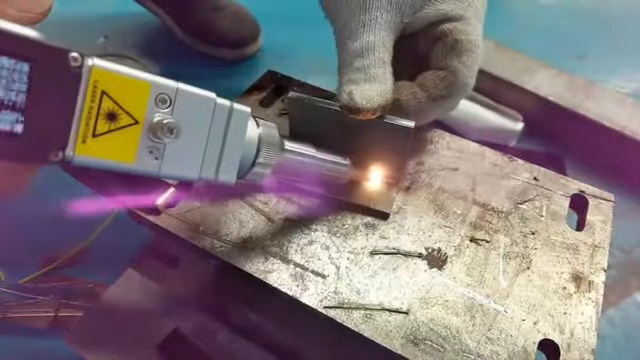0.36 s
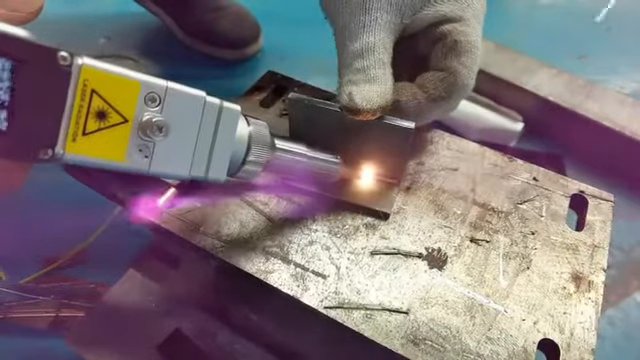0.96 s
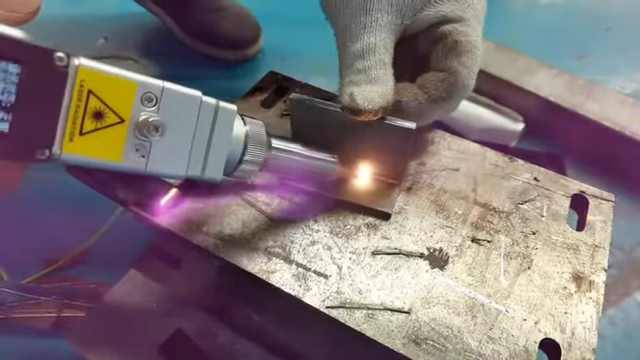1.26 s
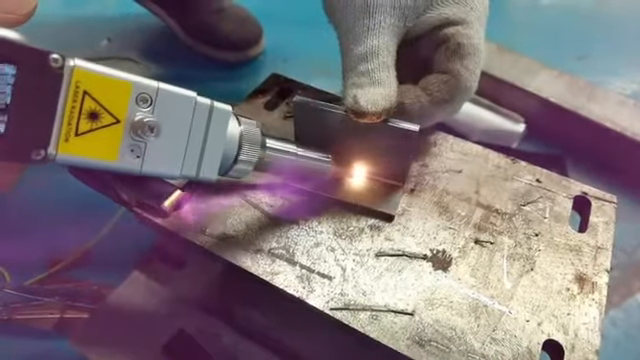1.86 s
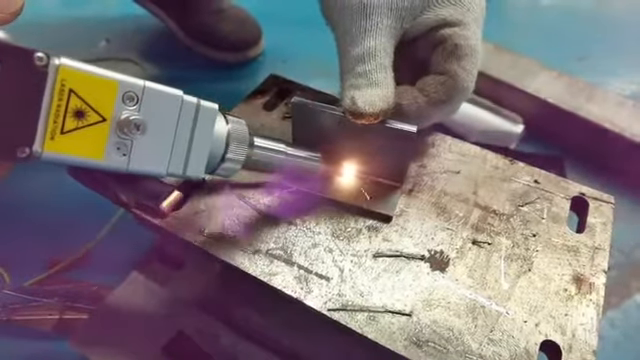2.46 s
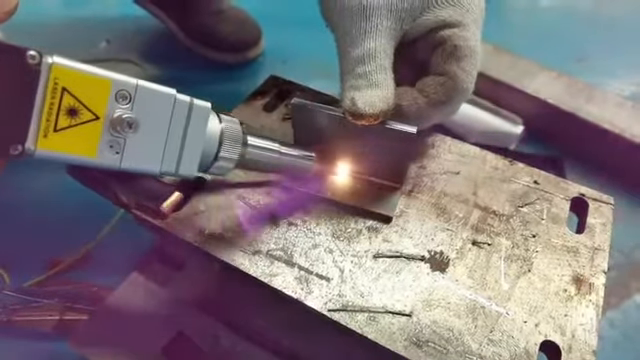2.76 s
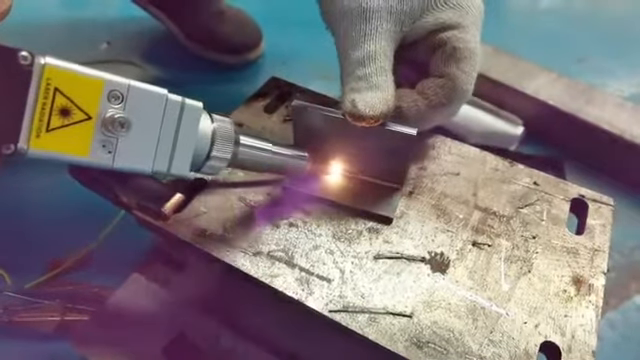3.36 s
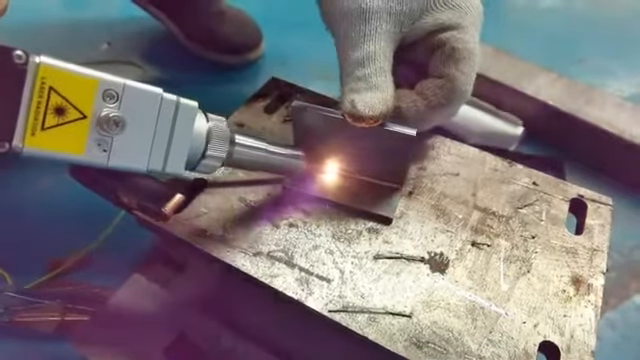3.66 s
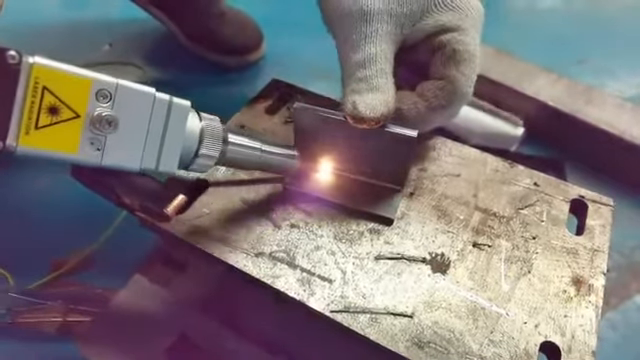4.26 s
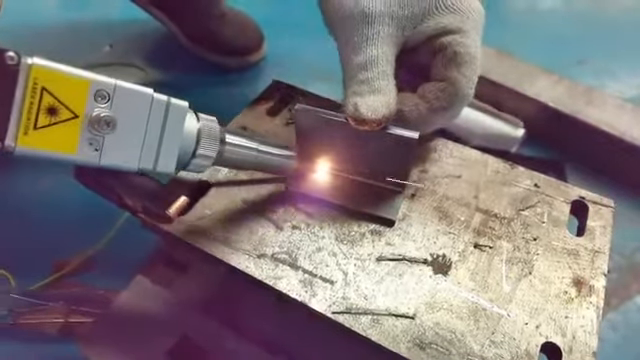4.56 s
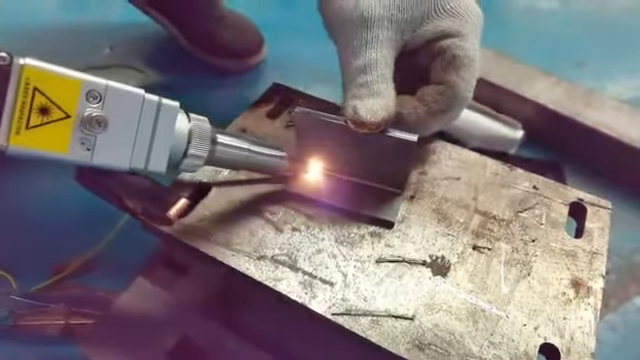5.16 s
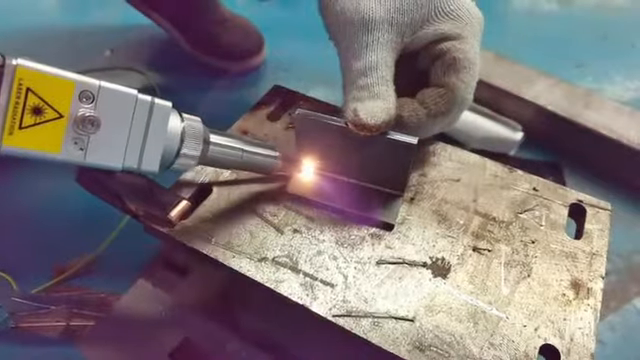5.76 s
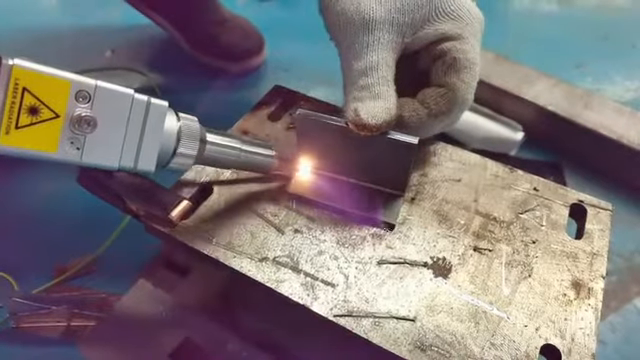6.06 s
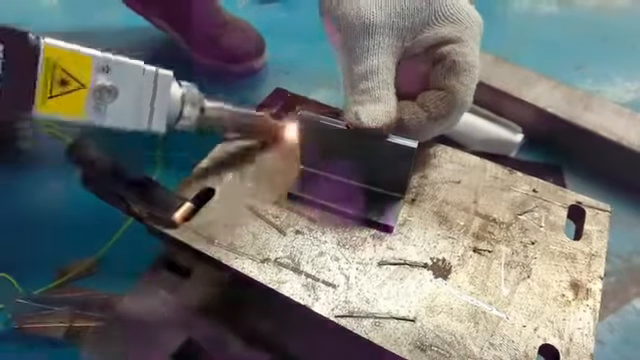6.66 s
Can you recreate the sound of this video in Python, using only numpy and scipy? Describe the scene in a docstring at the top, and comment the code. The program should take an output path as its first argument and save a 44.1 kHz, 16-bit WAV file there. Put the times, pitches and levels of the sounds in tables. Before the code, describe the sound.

Steady gas hiss and a buzzing sizzle of laser welding on metal, falling away at the end with a few tiny spits.

```python
"""A workshop: a handheld laser welder runs a seam along a steel plate, then lifts off with a few spits.
Shield gas hisses from the nozzle; the beam sweeps to and fro 104 times a second, so the metal vapour
sizzles in bursts and buzzes. Nozzle, joint and plate colour the sound as the torch travels.
Behind are fan air, soft bumps, one machine humming and another groaning a few times.
Almost everything is on the left; one small tap is on the right."""
import sys
import numpy as np
from scipy import signal
from scipy.fft import rfft, irfft
from scipy.io import wavfile
from scipy.ndimage import uniform_filter1d, minimum_filter1d

SR = 44100
rng = np.random.default_rng(int(sys.argv[2]) if len(sys.argv) > 2 else 0)


def store_wav(level_fs):
    """Save 16-bit WAV to argv[1]."""
    pcm = np.round(np.clip(np.atleast_2d(level_fs), -1, 1) * 32767)
    wavfile.write(sys.argv[1], SR, pcm.T.astype(np.int16))


N = 301203
T = np.arange(N) / SR
HZ = np.arange(2049) * SR / 4096
SWEEP_HZ, LIFT_S = 103.9165, 6.577


def undb(db):
    """Decibels to gain."""
    return 10 ** (np.asarray(db) / 20)


def noise():
    """White noise, unit RMS."""
    return rng.standard_normal(N)


def walk(rate_hz):
    """Smoothed random steps, unit spread."""
    hold = max(int(SR / rate_hz), 1)
    held = np.repeat(noise()[:N // hold + 1], hold)
    smooth = uniform_filter1d(uniform_filter1d(held, hold), hold)[:N]
    return smooth / smooth.std()


def pulse(centre_s, width_s):
    """Gaussian envelope, peak 1."""
    return np.exp(-.5 * ((T - centre_s) / width_s) ** 2)


def swells(events, attack_s, release_s):
    """Sum of rise-hold-fall envelopes."""
    return sum(undb(db) * np.clip((T - start_s) / attack_s, 0, 1)
               * np.clip(1 - (T - start_s - length_s) / release_s, 0, 1)
               for start_s, length_s, db in events)


def bell(hz, width_hz):
    """Gain curve of one resonance, peak 1."""
    return 1 / (1 + ((HZ ** 2 - hz ** 2) / ((HZ + 1) * width_hz)) ** 2)


def colour(points):
    """Gain curve through (freq_hz, gain_db) points."""
    hz, db = np.transpose(points)
    return undb(np.interp(np.log(HZ + 1), np.log(hz), db))


def shape(x, gain, band_hz=(0, SR)):
    """Minimum-phase filter, scaled so unit white noise gives unit RMS in the band."""
    in_band = (HZ >= band_hz[0]) & (HZ <= band_hz[1])
    gain = gain / np.sqrt(np.mean(gain ** 2 * in_band))
    cepstrum = irfft(np.log(gain + 1e-7))
    cepstrum[1:len(HZ) - 1] *= 2
    cepstrum[len(HZ):] = 0
    return signal.oaconvolve(x, irfft(np.exp(rfft(cepstrum))))[:N]


# Flow along the seam: time_s, gas_db, vapour_db
SEAM_FLOW = [(0.0, -25.5, -22.5), (1.2, -25.5, -23), (2.3, -24, -24.4), (2.75, -23.5, -25.5),
             (4.2, -23.5, -26.5), (4.55, -25.5, -25), (5.4, -25.5, -25), (6.2, -27, -28), (6.5, -26.5, -32)]
# Lifted beam grazing the plate: start_s, length_s, vapour_db
BEAM_GRAZES = [(6.635, 0.1, -36.5), (6.785, 0.012, -36)]


def torch(fade_s=0.01, drop_db=-5.5, fume_db=-45, edge_s=6.788, edge_width_s=0.017):
    """Gas and vapour levels: the melt pool wanders, the torch lifts, the jet slips over the edge."""
    times_s, *columns = np.transpose(SEAM_FLOW)
    gas_db, vapour_db = (np.interp(T, times_s, column) for column in columns)
    lifted = np.clip((T - LIFT_S) / fade_s + .5, 0, 1)
    spread_db = 0.55 + 0.6 * np.exp(-T / 0.66)  # pool settles
    pool_db = walk(12) * spread_db * (1 - lifted)
    beyond_edge = (1 + np.tanh((T - edge_s) / edge_width_s)) / 2
    edge_db = -11 * pulse(edge_s, edge_width_s) - 6.5 * beyond_edge
    grazes = swells(BEAM_GRAZES, attack_s=0.015, release_s=0.02)
    boiling = undb(vapour_db + pool_db) * (1 - lifted) + undb(fume_db) * lifted + grazes
    hiss_db = gas_db - 0.32 * pool_db  # more vapour, less hiss
    return hiss_db + drop_db * lifted + edge_db, 20 * np.log10(boiling)


# Nozzle, joint and plate modes: freq_hz, width_hz, gain_db, centre_seams, reach_seams
JOINT_MODES = [(1810, 2300, -33.0, 0.14, 1.5), (2152, 470, -21, 0.62, 0.66), (2570, 86, -19, 0.39, 0.47),
               (2790, 180, -25.0, 0.7, 0.49), (3523, 1160, -16.5, 0.41, 0.7), (3783, 136, -4.5, 0.43, 1.7),
               (4446, 730, -13.5, 0.38, 0.77), (4840, 470, -14.5, 0.82, 0.29),
               (5060, 280.0, -14.5, 0.15, 0.41), (5457, 420, -1.0, 0.66, 0.75),
               (5730, 590, -3.5, 0.33, 0.71), (6170, 680, -4, 0.47, 0.47), (6585, 195, -3, 0, 0.62),
               (6610, 1340, -5.5, 0.63, 0.35), (7190, 440, -6.5, 0, 0.98), (7590, 280, -2.5, 0.9, 0.55),
               (7670, 320, -7.5, 0, 0.57), (7970, 190, -3, 0.72, 0.23), (8600, 880, -1, 0.64, 1.1),
               (9200, 400, -5.5, 0.14, 1.2), (9550, 220, -2, 0.01, 0.72), (9630, 460, -7, 0.86, 0.28),
               (10290, 540, -5, 0.15, 0.89), (10680, 540, -3.5, 0.04, 0.33), (10870, 570, -7, 0.88, 0.22),
               (11500, 930, -18.5, 0.83, 1.86), (12070, 1300, -13.5, 0.6, 3.08),
               (13630, 2050, -12.5, 1, 1.1), (14430, 780.0, -15, 0.1, 0.46)]
# Plate reflection cancelling direct sound: freq_hz, width_hz, gain_db, centre_seams, reach_seams
PLATE_NOTCHES = [(2263, 80, -21.5, 0.81, 1.5), (4240, 150, -5.5, 0.14, 0.12), (4700, 160, -6, 0.3, 0.19),
                 (14150, 420, -8, 0.6, 0.36)]


def seam_response(place):
    """Gain curve of modes and notches at one torch position, 0-1 in seam lengths."""
    hz, width_hz, db, centre, reach = np.transpose(JOINT_MODES)[:, :, None]
    peaks = undb(db) * bell(hz, width_hz) / (1 + ((place - centre) / reach) ** 2)
    hz, width_hz, db, centre, reach = np.transpose(PLATE_NOTCHES)[:, :, None]
    dips_db = db * bell(hz, width_hz) / (1 + ((place - centre) / reach) ** 2)
    return np.sqrt(np.sum(peaks ** 2, axis=0)) * undb(dips_db.sum(axis=0))


def joint(x, spectrum, band_hz, positions=9):
    """Nozzle and joint ring; the colour glides as the torch travels."""
    travel = np.clip(T / LIFT_S, 0, 1)
    ringing = 0
    for place in np.linspace(0, 1, positions):
        nearness = np.maximum(1 - abs(travel - place) * (positions - 1), 0)
        ringing += shape(x * nearness, seam_response(place) * colour(spectrum), band_hz)
    return ringing


# Jet spectrum into the joint: freq_hz, gain_db
GAS_SPECTRUM = [(300, 8), (1000, -1), (2000, 0), (3000, -1), (3800, -1), (5500, -0.63), (7000, -2),
                (8500, -8), (11000, -5), (15000, -2.5)]
# Nozzle modes in free air: freq_hz, width_hz, gain_db
NOZZLE_MODES = [(2120, 530, -24), (3820, 370, -8), (5520, 310, 1), (6000, 1500, -7), (6650, 380, -7),
                (8100, 310, -11), (9200, 7100, -26)]


def gas(level_db, flutter_db=0.78, waver_db=0.9, band_hz=(3500, 7000), split_hz=4200):
    """Shield gas jet: an even hiss, hollower once the nozzle blows into free air."""
    jet = noise() * undb(level_db + flutter_db * walk(40))
    nozzle = np.sqrt(sum((undb(db) * bell(hz, width_hz)) ** 2 for hz, width_hz, db in NOZZLE_MODES))
    on_plate = joint(jet * (T < LIFT_S), GAS_SPECTRUM, band_hz)
    lifted = shape(jet * (T >= LIFT_S), nozzle, band_hz)
    hiss = undb(-1.41) * on_plate + undb(1) * lifted
    # the hiss below about 4 kHz wavers in level
    lower = signal.sosfiltfilt(signal.butter(6, split_hz, fs=SR, output="sos"), hiss)
    return hiss + lower * (undb(waver_db * walk(24.05)) - 1)


# Vapour spectrum into the joint: freq_hz, gain_db
VAPOUR_SPECTRUM = [(300, -11), (1000, -10.5), (2000, -6), (3000, -3), (3800, -7.5), (5500, -4), (7000, -2),
                   (8500, 0), (11000, -0.6), (15000, -2)]
# Bursts within one sweep: phase_sweeps, width_sweeps, gain_db
VAPOUR_BURSTS = [(.08, 0.11, -10), (.405, 0.084, -4.5), (.52, 0.063, -6), (.77, 0.046, -11)]


def vapour(level_db, trim_db=-1.13, scatter_db=0.8, surge_db=0.48, grain_db=1.0):
    """Metal boils off in uneven bursts locked to the beam's sweep."""
    power = 0
    for phase, width, db in VAPOUR_BURSTS:
        offset = (T * SWEEP_HZ - phase + .5) % 1 - .5
        power += undb(db) ** 2 * np.exp(-.5 * (offset / width) ** 2)
    uneven_db = scatter_db * walk(180) + surge_db * walk(25) + grain_db * walk(2500)
    envelope = np.sqrt(power) * undb(uneven_db)
    envelope /= np.sqrt(np.mean(envelope ** 2))
    sizzle = joint(noise() * envelope, VAPOUR_SPECTRUM, band_hz=(8000, 15000))
    return sizzle * undb(level_db + trim_db)


# Melt pool harmonics: sweep_multiple, level_db
POOL_HARMONICS = [(6, -76), (7, -75), (8, -72.5), (9, -74.5), (15, -73.5), (17, -66), (19, -67.5),
                  (25, -61.5), (28, -74), (30, -71)]


def buzz(waver_db=2, fade_s=0.022):
    """The part of the boiling that repeats each sweep; stops at lift-off."""
    lines = 0
    for multiple, db in POOL_HARMONICS:
        amplitude = np.sqrt(2) * undb(db + waver_db * walk(5.5))
        lines += amplitude * np.sin(2 * np.pi * (multiple * SWEEP_HZ * T + rng.random()))
    return lines * np.clip((LIFT_S - T) / fade_s, 0, 1)


def motor(pitch_hz, level_db, waver_hz, waver_db=2.0):
    """Motor tone, wandering in pitch and level."""
    cycles = np.cumsum(pitch_hz + waver_hz * walk(13)) / SR
    return np.sqrt(2) * undb(level_db + waver_db * walk(5.87)) * np.sin(2 * np.pi * cycles)


# Machine hum: pitch_hz, level_db, waver_hz
HUM_LINES = [(114.7, -67, 2.12), (200.5, -64, 0.69)]
# Fan air spectrum: freq_hz, gain_db
AIR_SPECTRUM = [(20, -5), (55, -6.5), (75, -6.5), (100, 5), (170, 2), (240, -1.5), (330, -3), (420, -6.5),
                (800, -7.5), (1500, -11), (4000, -21), (15000, -35)]


def hum_and_air(air_db=-56, swell_db=0.94):
    """A machine hums over gently swelling fan air."""
    hum = sum(motor(*line) for line in HUM_LINES)
    air = shape(noise(), colour(AIR_SPECTRUM)) * undb(air_db + swell_db * walk(5))
    return hum + air


# Low bumps: centre_s, level_db
LOW_BUMPS = [(.48, -54), (1.36, -57), (4.81, -57), (5.24, -52.5)]


def bumps(width_s=0.025):
    """Soft bumps: noise pulses through one low resonance."""
    envelope = sum(undb(db) * pulse(centre_s, width_s) for centre_s, db in LOW_BUMPS)
    return shape(noise() * envelope, bell(hz=105, width_hz=30))


# Tick spectrum: freq_hz, gain_db
TICK_SPECTRUM = [(100, -12), (300, -2), (2800, 0), (4500, -11), (11000, -14), (15000, -22)]


def tap(start_s=1.3412, tick_db=-14, thud_db=-32, thud_hz=125, decay_s=0.0075):
    """One small tick with a short, damped thud."""
    age_s = np.maximum(T - start_s, 0)
    tick = shape(signal.unit_impulse(N, int(start_s * SR)), colour(TICK_SPECTRUM))
    thud = np.exp(-age_s / decay_s) * np.sin(2 * np.pi * thud_hz * age_s)
    return undb(tick_db) * tick - undb(thud_db) * thud


# Distant machine groans: start_s, length_s, level_db
MACHINE_GROANS = [(2.38, 0.15, -62), (2.53, 0.53, -54), (3.3, 0.21, -58.5), (3.85, 0.13, -61),
                  (4.2, 0.087, -62.5)]


def groans(pitch_hz=254.5, rumble_db=-5, octave_db=-64):
    """A distant machine groans over a rough rumble and briefly sounds its octave."""
    rumble = shape(noise(), bell(hz=250, width_hz=200)) * undb(rumble_db)
    envelope = swells(MACHINE_GROANS, attack_s=0.053, release_s=0.06)
    tone = motor(pitch_hz, level_db=0, waver_hz=0.95)
    octave = pulse(centre_s=3.65, width_s=0.09) * motor(2 * pitch_hz, octave_db, waver_hz=3.05)
    return envelope * (tone + rumble) + octave


# Spits as the beam leaves the plate: time_s, gain_db
EDGE_SPITS = [(6.7104, -22), (6.7375, -23), (6.7484, -25), (6.7574, -27), (6.7674, -25), (6.787, -24),
              (6.7955, -19), (6.8056, -17)]
# Spit spectrum: freq_hz, gain_db
SPIT_SPECTRUM = [(1000, -36), (4000, -26), (6500, -17), (7600, 2), (8500, 6), (9800, -7.5), (10900, -1),
                 (12000, -20), (15000, -18)]


def spits(trim_db=-6, width_s=0.0012, delay_s=0.00088):
    """Single sweeps catch the plate's edge, each a tiny puff."""
    envelope = sum(undb(db) * pulse(time_s + delay_s, width_s) for time_s, db in EDGE_SPITS)
    return shape(noise() * envelope, colour(SPIT_SPECTRUM)) * undb(trim_db)


def whistle(pitch_hz=8080, width_hz=200, level_db=-31):
    """The jet whistles briefly as it crosses the edge."""
    ring = shape(noise(), 1 / (1 + ((HZ - pitch_hz) / width_hz) ** 2))
    return ring * undb(level_db) * pulse(centre_s=6.821, width_s=0.006)


def reflections(x, wet_db=-14, t60_s=0.082):
    """Adds short, weak echoes from bench and floor."""
    age_s = T[:SR // 4]
    echoes = noise()[:len(age_s)] * undb(-60 * age_s / t60_s)
    return x + undb(wet_db) * signal.oaconvolve(x, echoes / np.linalg.norm(echoes))[:N]


def scene():
    """Weld and workshop on the left, barely there on the right; tap on the right only."""
    gas_db, vapour_db = torch()
    weld = reflections(gas(gas_db) + vapour(vapour_db) + spits() + whistle()) + buzz()
    room = hum_and_air() + bumps() + groans()
    left = undb(6) * (weld + room)
    right = undb(-53.5) * weld + undb(-37) * room + tap()
    return np.array([left, right])


def record(dry):
    """Phone: peak limiter, then a steep low-pass."""
    ceiling, hold_samples, cutoff_hz = 0.8, SR // 400, 15050
    gain = np.minimum(ceiling / (abs(dry).max(axis=0) + 1e-9), 1)
    gain = uniform_filter1d(minimum_filter1d(gain, hold_samples), hold_samples)
    return signal.sosfilt(signal.ellip(12, .2, 70, cutoff_hz, fs=SR, output="sos"), dry * gain)


dry = scene()
out = record(dry)
store_wav(out)
```